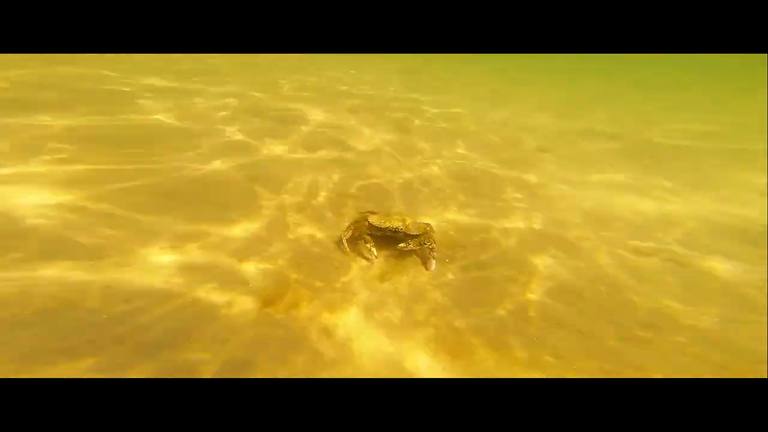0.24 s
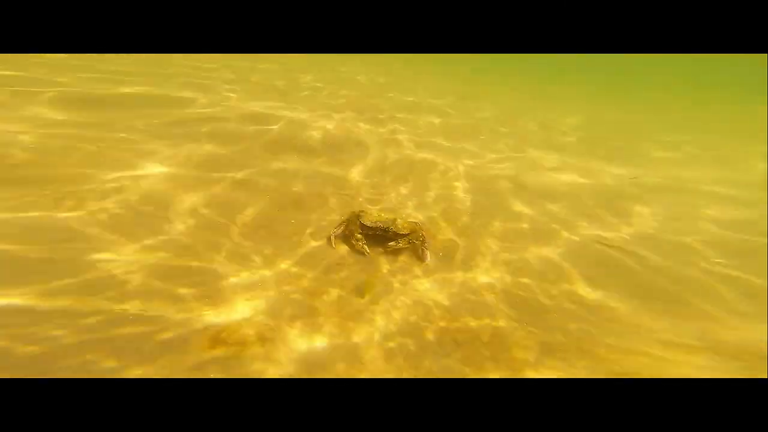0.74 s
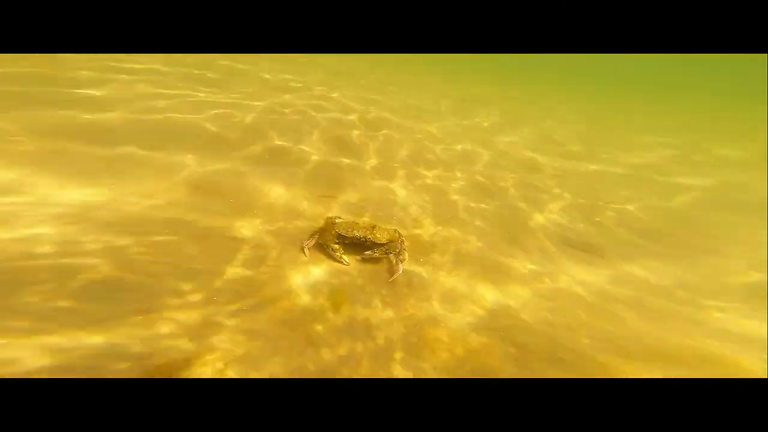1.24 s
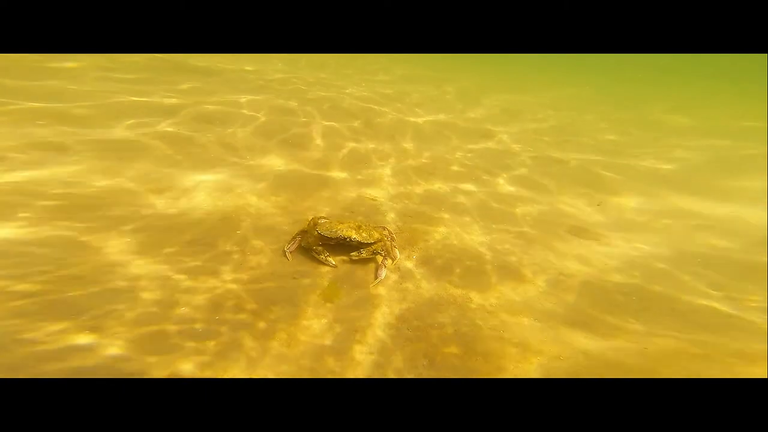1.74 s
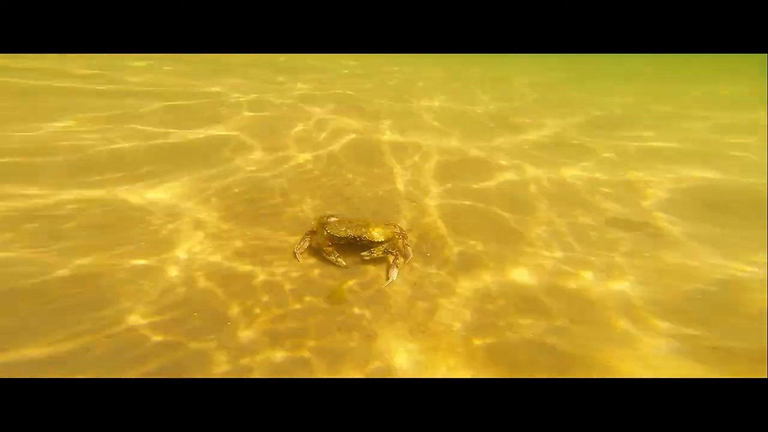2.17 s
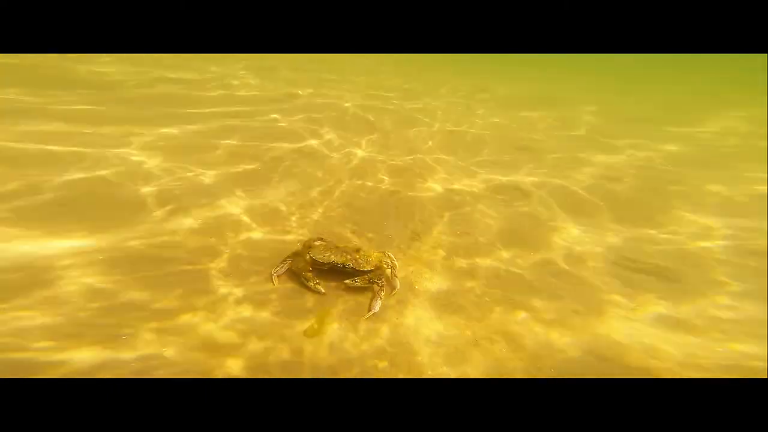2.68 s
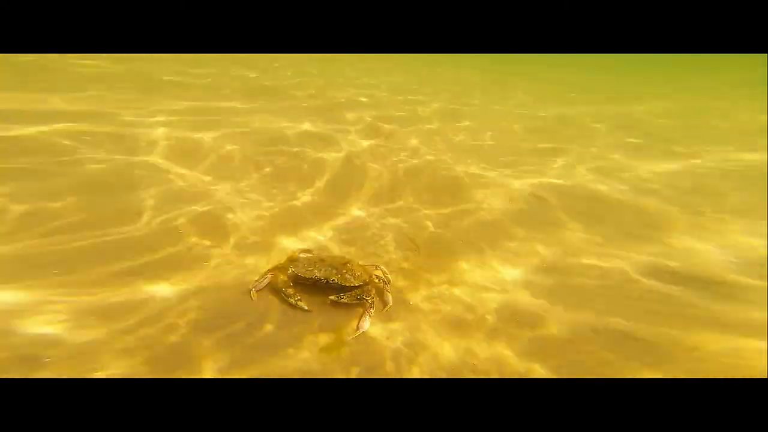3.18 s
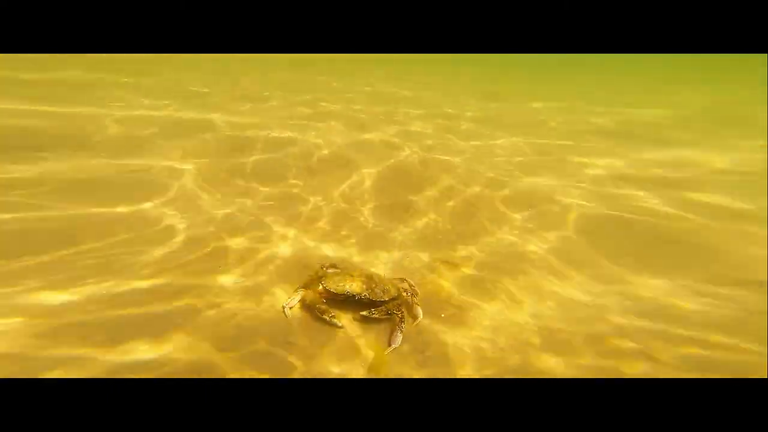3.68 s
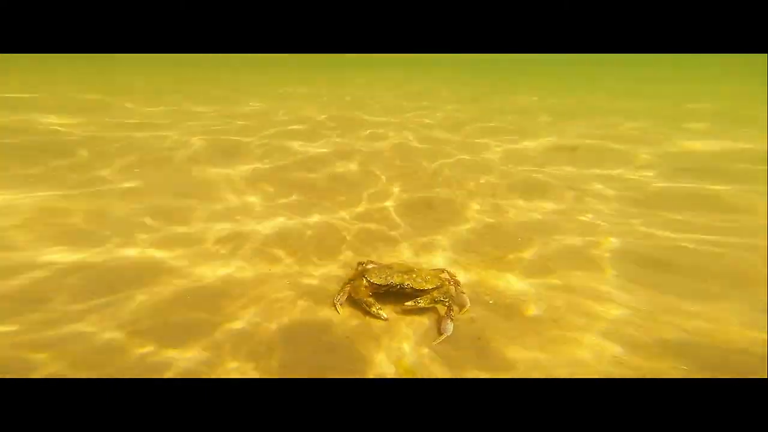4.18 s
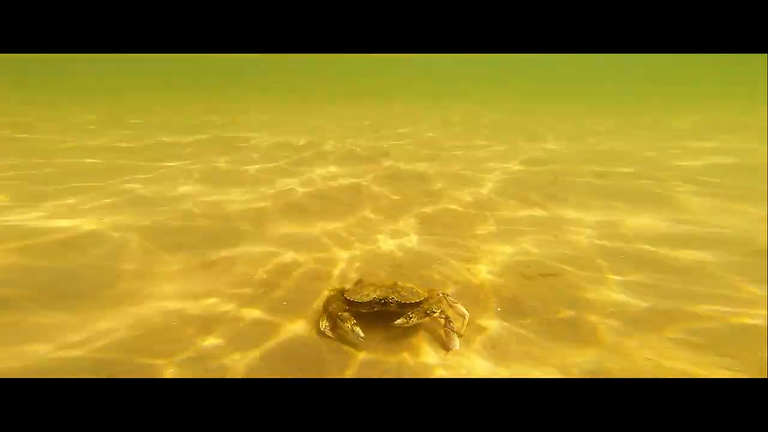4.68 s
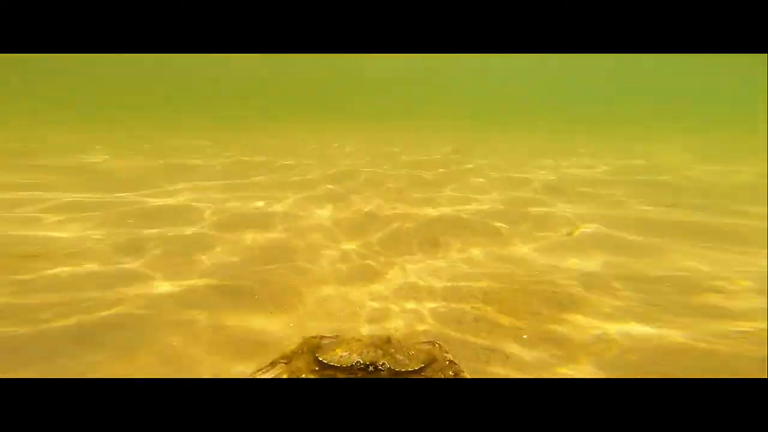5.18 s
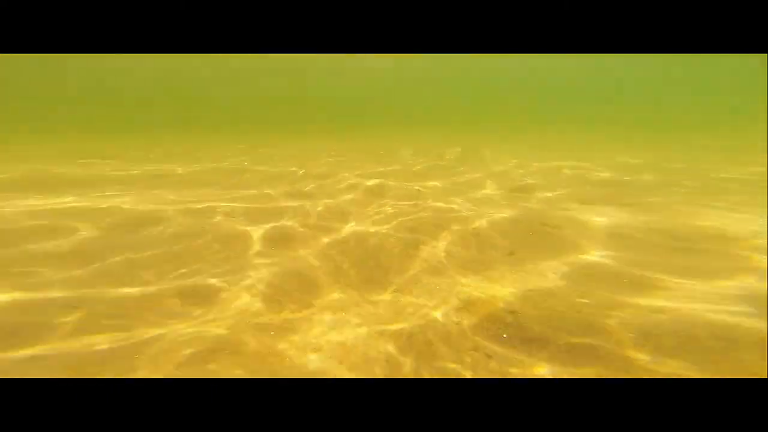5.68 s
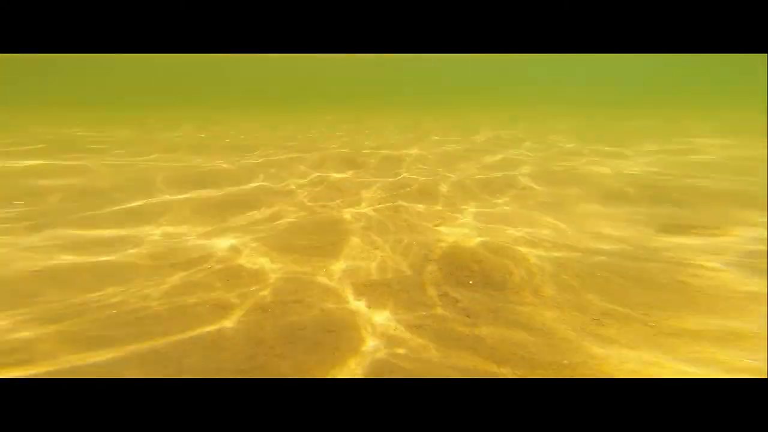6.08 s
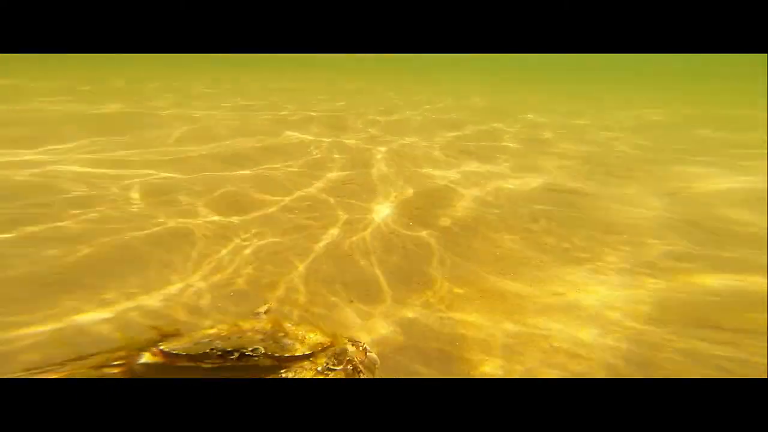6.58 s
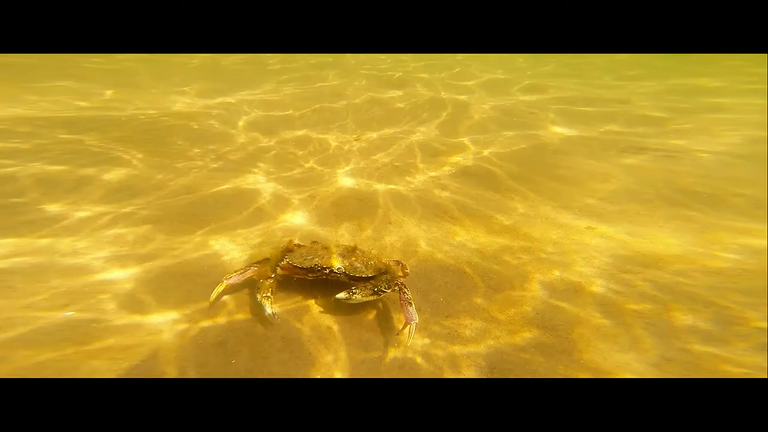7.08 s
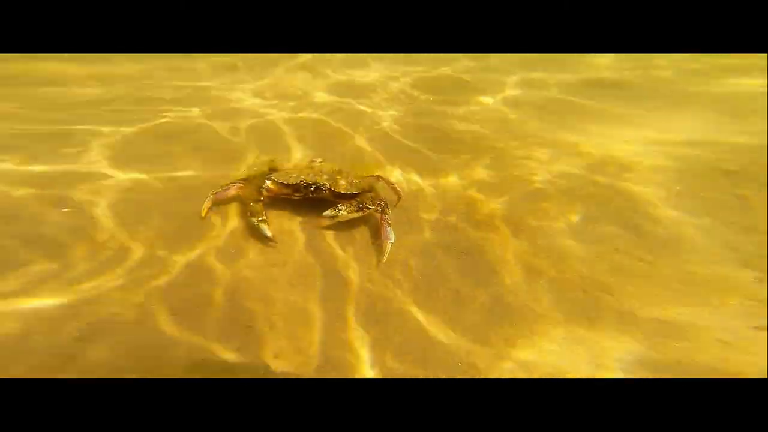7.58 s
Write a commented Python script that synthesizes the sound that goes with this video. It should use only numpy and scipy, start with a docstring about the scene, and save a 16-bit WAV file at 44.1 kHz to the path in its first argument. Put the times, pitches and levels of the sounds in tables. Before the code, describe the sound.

The microphone sits inside a plastic waterproof case held in shallow sea, so everything is close, dry and muffled. Low water rumble, barely audible gurgle and steady electronic hiss run throughout, with a thin high whine and pips switching in quick beats. Small clicks come at 0.2, 0.4 and 1.5 s, with faint creaks and rubbing around 1.1 s. After a quieter stretch, a short groan and tight squeak near 3.1 s lead to crisp click clusters at 3.2 and 3.4 s. Creaks run from 4.4 to 4.9 s with tiny bubble blips; soft hollow bumps multiply from 5 to 6.5 s, with a bubble plop and water surge at 6.3. A strong click and boom at 6.76 start the climax: hard chattering knocks at 7.0, rough rubbing and bright creaks until 7.3. It calms, then deep thuds land around 7.76 s.

```python
"""Low water rumble, gurgle and hiss run throughout, under the dry clicks of a hand gripping a plastic case.
The microphone is in a camera in that waterproof case, carried through shallow sea above a crab on sand.
The grip creaks in runs of tiny slips, and bumps of the hand make the case boom; late on it is knocked and
rubbed hard. Contacts ring resonances of the case, water is shaped noise with single sine bubbles, and the
electronics add filtered noise: a steady hiss, with a whine and pips gated in beats."""
import sys
import numpy as np
from scipy import signal
from scipy.fft import rfft, irfft
from scipy.io import wavfile
from scipy.ndimage import uniform_filter1d

SR = 44100
rng = np.random.default_rng(int(sys.argv[2]) if len(sys.argv) > 2 else 0)


def output_pcm(signal):
    """Save a mono or channel-first signal as 16-bit PCM at the path in sys.argv[1].

    Samples are clipped to [-1, 1] before scaling.
    """
    pcm = np.clip(np.atleast_2d(signal).T, -1, 1) * 32767
    wavfile.write(sys.argv[1], SR, np.round(pcm).astype(np.int16))


N = 345303
TIME = np.arange(N) / SR  # s
RING_SIZE = 8192  # samples in the ring of one blow
RING_HZ = np.maximum(np.fft.rfftfreq(RING_SIZE, 1 / SR), 1)

# Resonances of the case walls. Each row: frequency in Hz, width in Hz, relative level in dB.
WALL_MODES = [(555, 33, -7), (649, 106, 1.5), (798, 62, -7.5), (885, 85, -6), (1222, 33, -10.5),
              (1267, 34, -13.5), (1435, 39, -2), (1508, 168, 3.5), (1787, 120, -0.5), (1897, 120, -1.5),
              (2010, 160, -5.5), (2207, 130, -1.5), (2370, 60, -11), (2405, 72, -2.5), (2545, 140, -2.5),
              (2744, 230, -12.5), (2977, 150, -14), (3710, 470, -28.5), (4066, 250, -24.5),
              (4860, 240, -32.5), (5600, 350, -48), (6800, 350, -47), (7300, 130, -45)]
# The whole case bouncing in the hand. Each row: frequency in Hz, width in Hz, relative level in dB.
BOUNCE_MODES = [(45, 33, -16.5), (105, 59, -7.5), (135, 18, -7), (158.2, 17.1, 0)]


def creaks():
    """The grip lets go in runs of short, dry slips that ring the case walls."""
    return blows(slip_runs(), WALL_MODES, grit_db=-0.5, grit_t60=0.023, tail_db=-12.5, tail_t60=0.052)


def slip_runs(size=32, jitter=0.05, scatter_db=2.3, edge_db=-3):
    """Slips come at an almost even rate as the load rises or falls: rows (s, dB, brightness, edge dB)."""
    # Runs of slips. Each row: start in seconds, end in seconds, slips per second, level at the start in dB,
    # level at the end in dB, brightness in dB per octave.
    creak_table = [(1.061, 1.082, 118, -47.5, -42, 2.5), (1.151, 1.197, 78, -47, -45, -6.5),
                   (3.096, 3.183, 116, -49.5, -49, -4), (4.452, 4.48, 50, -49, -42, -4),
                   (4.498, 4.567, 73, -45, -47.5, -6.5), (4.6, 4.686, 66, -44.5, -50, -6),
                   (4.745, 4.847, 68.3, -40, -42, -9), (5.237, 5.277, 91, -45, -40, -9),
                   (5.956, 5.985, 50, -52, -47, -16), (6.099, 6.139, 75, -45.5, -46, -10.5),
                   (6.813, 6.918, 73, -39, -40.5, -12), (7.162, 7.203, 113, -34, -27.5, 6.5),
                   (7.209, 7.244, 93, -29, -50, 6), (7.277, 7.319, 118, -40, -42.5, 1)]
    rows = []
    for start, end, per_s, first_db, last_db, tilt_db in creak_table:
        uneven_time, uneven_level = rng.standard_normal((2, size))
        # jitter is a share of the gap between slips
        times = start + (np.arange(size) + jitter * uneven_time) / per_s
        levels = np.interp(times, [start, end], [first_db, last_db]) + scatter_db * uneven_level
        rows += [(s, db, tilt_db, edge_db) for s, db in zip(times, levels) if s < end]
    return rows


def clicks():
    """Slips of the grip, loud and faint, alone or in short uneven groups, set the case walls ringing."""
    # Each row: time in seconds, level in dB, brightness in dB per octave, lift of the sharp edge in dB.
    click_table = [(0.188, -38.5, 1.5, 8), (0.207, -46, 3, 0), (0.213, -38.5, 3, 4), (0.222, -49, -3, 0),
                   (0.414, -32.5, 0, 10), (0.429, -35, 0.5, -1), (0.436, -40, -3, -4), (0.446, -44, -5, 0),
                   (0.775, -53, 0, 0), (1.054, -42.5, -5, 0), (1.533, -39.5, 1, 5), (1.543, -45, -2, 0),
                   (3.186, -37, 4, 10), (3.194, -32, 3, 10), (3.205, -31, 2.5, 5), (3.221, -35.5, 11, -8),
                   (3.226, -34.5, -1.5, 10), (3.402, -29.5, 3.5, -11), (3.409, -29.5, -4.5, -8),
                   (3.421, -31, -3, -4), (3.433, -34, -6, -5), (3.56, -45.5, -8, -2),
                   (3.909, -34.5, -1, -9), (3.928, -42.5, -5, -2), (4.17, -46.5, -3, -4),
                   (4.862, -43, -1.5, 11), (5.069, -40.5, -0.5, -8), (5.089, -47, -4, -2),
                   (5.198, -41.5, -6, -2), (5.287, -34.5, -6, -6), (5.317, -39.5, -4.5, -2),
                   (5.332, -44.5, -8, -2), (5.573, -44.5, -4, 6), (6.318, -39, -15.5, 0),
                   (6.468, -49.5, -4, 0), (6.707, -44.5, -5, -2), (6.742, -38, -4, -4),
                   (6.752, -41, -6, -2), (6.762, -24, -2, 1), (6.771, -25.5, -5, -2),
                   (6.778, -25.5, -7, -5), (6.945, -35, -11, 0), (6.966, -35.5, -6.5, 5),
                   (7.106, -37, -4, 2), (7.115, -34.5, -5.5, -3), (7.567, -44.5, -3, -1)]
    return blows(click_table, WALL_MODES, grit_db=-3.0, grit_t60=0.015, tail_db=-13.5, tail_t60=0.06)


def knocks():
    """Hard contacts against the case chatter and favour the middle modes of the walls."""
    # How well a knock couples to the walls. Each row: frequency in Hz, gain in dB.
    coupling = [(550, -5.5), (680, -8), (880, 0.5), (1250, 4), (1500, 2), (2000, 2), (2500, -3),
                (3000, 0.5), (4100, -2.5), (7000, -8)]
    at_hz, gain_db = np.transpose(coupling)
    modes = []
    for hz, width, db in WALL_MODES:
        modes.append((hz, width, db + np.interp(np.log(hz), np.log(at_hz), gain_db)))
    return blows(rebounds(), modes, grit_db=5.0, grit_t60=0.017, tail_db=-28.5, tail_t60=0.033)


def rebounds(gap_s=0.0038, loss_db=4.5, dulling_db=5.5):
    """Each rebound of a knock is weaker and duller: rows (s, dB, brightness, edge dB)."""
    # First contacts. Each row: time in seconds, level in dB, brightness in dB per octave,
    # lift of the sharp edge in dB, chatter in seconds.
    knock_table = [(6.99, -21, -3.5, -1, .006), (7.0, -11, -1, -3, .006), (7.023, -19, 0, 3, .002),
                   (7.035, -21, -4.5, 3, .002), (7.04, -9.5, 5, 6, .01), (7.051, -12.5, 3, -2.5, .014)]
    rows = []
    for s, db, tilt_db, edge_db, chatter_s in knock_table:
        for k in range(1 + int(chatter_s / gap_s)):
            rows.append((s + k * gap_s, db - k * loss_db, tilt_db - k * dulling_db, edge_db))
    return rows


def bumps():
    """A soft push of the hand sets the whole case bouncing for a few cycles."""
    # Each row: time in seconds, level in dB, brightness in dB per octave.
    bump_table = [(1.05, -46, 19), (1.716, -44, 5), (1.877, -45.5, -4), (2.093, -46.5, 4), (2.138, -48, 6),
                  (2.97, -42, -4), (3.4, -41, -5), (4.107, -44, -2), (4.248, -43.5, 10), (4.585, -41, 3),
                  (4.92, -39.5, -2.5), (4.991, -38, 4), (5.31, -37.5, -3), (5.408, -44, 0),
                  (5.493, -36, -3), (5.522, -36.5, 10), (5.658, -34, 5), (5.726, -47, -4), (5.748, -38, 6),
                  (5.823, -43.5, 3), (5.88, -40, 6), (6.006, -36, 6), (6.141, -38, 1), (6.209, -37, 9),
                  (6.251, -39.5, 18), (6.295, -41, 6), (6.457, -41, 2), (6.777, -25, 4), (6.849, -33, 14),
                  (7.001, -28.5, 29.5), (7.151, -41.5, 13), (7.206, -42, 20), (7.756, -24, 25),
                  (7.77, -26, 9), (7.805, -34, 22)]
    out = np.zeros(N)
    for s, db, tilt_db in bump_table:
        bounce = body(BOUNCE_MODES, scatter_db=3.5, tilt_db=tilt_db)
        add(out, s, -at_level(bounce, db, span=0.023))
    return out


def rubbing(dull_tilt_db=-16.0, crisp_tilt_db=-3.5, peak_share=0.45):
    """Sliding fingers shed dense micro-slips: soft ones favour the low wall modes, hard ones reach higher."""
    # Strokes. Each row: start in seconds, end in seconds, dull rub in dB, crisp rub in dB.
    stroke_table = [(1.15, 1.243, -55.5, -57), (1.287, 1.322, -60, -73), (1.444, 1.502, -62, -59),
                    (1.504, 1.67, -77, -57.5), (1.66, 1.725, -77, -53.5), (1.748, 1.81, -74, -55),
                    (2.473, 2.613, -56, -79), (2.674, 2.834, -58.5, -84), (3.044, 3.224, -62, -53),
                    (3.433, 3.632, -57.5, -66), (3.898, 4.039, -56, -55), (4.147, 4.197, -74, -52.5),
                    (4.205, 4.32, -54.5, -53), (4.715, 4.758, -43, -59), (6.73, 6.832, -44, -48),
                    (6.854, 6.995, -46.5, -50), (7.016, 7.153, -42.5, -58), (7.155, 7.255, -40.5, -44),
                    (7.26, 7.323, -45.5, -50), (7.562, 7.601, -63.5, -54.5), (7.745, 7.883, -55, -53.5)]
    dull = through(grains(per_s=900, spread_db=-1.5), WALL_MODES, tilt_db=dull_tilt_db)
    crisp = through(grains(per_s=1000, spread_db=4.5), WALL_MODES, tilt_db=crisp_tilt_db)
    soft, hard = np.zeros((2, N))
    for start, end, dull_db, crisp_db in stroke_table:
        # the finger presses hardest at peak_share of the stroke
        along = TIME[:SR] / (end - start)
        pressure = np.sqrt(np.interp(along, [0, peak_share, 1], [0, 1, 0]))
        add(soft, start, from_db(dull_db) * pressure)
        add(hard, start, from_db(crisp_db) * pressure)
    return disperse(soft * dull + hard * crisp)


def squeak(start_s=3.065, end_s=3.2, level_db=-48.5, attack_s=0.024, release_s=0.01):
    """A dry, tight rub: very dense micro-slips, band-limited to ring the middle modes of the walls."""
    band = signal.butter(2, [1450, 2250], "band", fs=SR, output="sos")
    slips = grains(per_s=1200, spread_db=4.5) + 1e-18
    rasp = through(signal.sosfilt(band, slips), WALL_MODES)
    ramps = np.minimum((TIME - start_s) / attack_s, (end_s - TIME) / release_s)
    pressure = np.clip(ramps, 0, 1) ** 2
    return from_db(level_db) * pressure * rasp


def groans(waver=0.074):
    """A finger sticks and slips fast enough to groan: an unsteady tone and overtone, swelling and dying."""
    # Each row: start in seconds, end in seconds, starting pitch in Hz, ending pitch in Hz,
    # level at mid-groan in dB, overtone in dB relative to the first tone.
    groan_table = [(2.98, 3.121, 361, 446, -67, 6), (4.295, 4.472, 530, 452, -60, -22),
                   (6.904, 6.978, 241.5, 284, -47, 3.5)]
    out = np.zeros(N)
    wobble = 1 + waver * rms_one(uniform_filter1d(rng.standard_normal(SR), size=300))
    for start, end, start_hz, end_hz, db, overtone_db in groan_table:
        along = np.clip(TIME[:SR] / (end - start), 0, 1)
        pitch_hz = wobble * (start_hz + (end_hz - start_hz) * along)
        phase = 2 * np.pi * np.cumsum(pitch_hz) / SR
        swell = np.sqrt(8 * along * (1 - along))
        tone = np.sin(phase) + from_db(overtone_db) * np.sin(2 * phase)
        add(out, start, from_db(db) * swell * tone)
    return out


def tremor(trim_db=2.0):
    """The unsteady hand keeps the case booming: sparse random pushes ring its bounce modes."""
    # Each row: time in seconds, level in dB before the trim.
    tremor_table = [(0.0, -53), (0.75, -70), (1.08, -55), (1.4, -56), (1.78, -56), (2.4, -58),
                    (3.05, -54.5), (3.35, -60.5), (3.95, -52), (4.4, -55), (4.75, -54), (5.15, -58.5),
                    (5.7, -55.5), (6.6, -58), (7.0, -41), (7.45, -62), (7.83, -55)]
    boom = gain_in_time(tremor_table)
    return from_db(trim_db) * boom * through(grains(per_s=60, spread_db=3.5), BOUNCE_MODES)


def ticks(decay_s=0.0025):
    """Sharp grains of sand tick on the case: tiny bright noise bursts, too light to ring the walls."""
    # Each row: time in seconds, level in dB.
    tick_table = [(0.4135, -70), (1.6841, -63), (3.8571, -57), (4.1599, -61), (4.2028, -58), (4.862, -57),
                  (5.571, -58), (7.2403, -52), (7.5026, -53.5)]
    out, t = np.zeros(N), TIME[:RING_SIZE]
    bright = signal.butter(4, [3200, 9800], "band", fs=SR, output="sos")
    for s, db in tick_table:
        burst = rng.standard_normal(RING_SIZE) * np.exp(-t / decay_s)
        add(out, s, at_level(signal.sosfilt(bright, burst), db, span=0.0013))
    return out


def bubbles(rise=1.5):
    """Single bubbles close by: each rings briefly as a decaying sine, its pitch creeping up."""
    # Each row: time in seconds, peak level in dB, starting pitch in Hz, time to fall by 60 dB in seconds.
    bubble_table = [(3.859, -38.5, 3090, 0.015), (4.864, -33.5, 2750, 0.0054), (4.737, -39, 900, 0.012),
                    (5.115, -43, 890, 0.028), (6.288, -30, 690, 0.016), (6.291, -33, 1457, 0.053)]
    out, t = np.zeros(N), TIME[:RING_SIZE]
    for s, db, hz, t60 in bubble_table:
        decay = from_db(db - 60 * t / t60)
        add(out, s, decay * np.sin(2 * np.pi * hz * t * (1 + rise * t)))
    return out


def flow(trim_db=-0.5, surge_top_hz=60):
    """Water rumbles round the case, with a deep, smooth swell as the camera is swung and water surges past."""
    # Colour of the rumble. Each row: frequency in Hz, relative density in dB per Hz.
    rumble_colour = [(10, -5), (22, 0), (40, 1.5), (70, -7.5), (120, -14.5), (200, -25.5), (400, -25.5),
                     (1000, -53), (3000, -63)]
    # Slowly changing flow. Each row: time in seconds, level in dB before the trim.
    flow_table = [(0.0, -49), (0.7, -54.5), (1.9, -50.5), (3.2, -53), (3.85, -47.5), (4.15, -53),
                  (6.1, -54), (7.1, -41), (7.5, -49.5), (7.83, -44)]
    # Surges. Each row: strongest moment in seconds, length in seconds, level in dB.
    surge_table = [(1.15, .12, -45), (1.3, 0.11, -49), (3.48, .14, -44), (6.294, 0.14, -38.5),
                   (6.45, 0.23, -42), (6.791, .2, -33), (6.904, 0.15, -43), (7.33, 0.12, -43),
                   (7.757, 0.052, -29)]
    rumble = from_db(trim_db) * gain_in_time(flow_table) * noise(rumble_colour)
    swell = np.zeros(N)
    for s, length, db in surge_table:
        swell += from_db(db) * np.cos(np.pi * np.clip((TIME - s) / length, -0.5, 0.5)) ** 2
    low_pass = signal.butter(2, surge_top_hz, fs=SR, output="sos")
    deep = rms_one(signal.sosfilt(low_pass, noise(rumble_colour)))
    return rumble + swell * deep


def gurgle(per_s=700, cycles=16.6, low_hz=430, high_hz=950, muffle_hz=1500):
    """A crowd of small far bubbles: random pops dealt to 20 resonators over about an octave, rms 1."""
    pops = grains(per_s, spread_db=3.5)
    dealt = rng.integers(0, 20, N)
    out = np.zeros(N)
    for k, hz in enumerate(np.geomspace(low_hz, high_hz, 20)):
        r = np.exp(-np.log(1000) * hz / (cycles * SR))  # falls by 60 dB in this many cycles
        w = 2 * np.pi * hz / SR
        poles = [1, -2 * r * np.cos(w), r * r]
        out += signal.lfilter([1, 0, -1], poles, pops * (dealt == k) + 1e-18)
    return rms_one(signal.sosfilt(signal.butter(2, muffle_hz, fs=SR, output="sos"), out))


def electronics(hiss_db=-59.5, beat_s=0.138):
    """Steady hiss inside the case, with a thin whine and high pips of resonant noise gated in beats."""
    # Colour of the hiss. Each row: frequency in Hz, relative density in dB per Hz.
    hiss_colour = [(20, -3.5), (250, 2.5), (450, -6), (1000, -9), (2000, -10.5), (4000, -16.5),
                   (6000, -19.5), (9000, -26), (11000, -26), (12000, -33), (14000, -31.5), (15000, -37.5)]
    # Resonances of the whine. Each row: frequency in Hz, width in Hz, relative level in dB.
    whine_modes = [(6510, 91, 5.5), (6440, 830, -7), (10350, 220, 2.5), (10570, 2200, -7.5),
                   (12980, 200, -14), (13780, 150, -12)]
    # Resonances of the pips. Each row: frequency in Hz, width in Hz, relative level in dB.
    pip_modes = [(9770, 200, -7), (11250, 110, 7)]
    # Buzzing spells. Each row: start in seconds, end in seconds, share of each beat that is on,
    # whine in dB, pip in dB.
    buzz_table = [(0.0, .48, 0.28, -80, -76), (0.556, .68, 0.94, -72.5, -93), (.74, 1.282, 0.97, -72, -99),
                  (1.29, 1.338, 1, -83, -81), (1.397, 1.449, 1, -71, -76), (1.533, 3.1, 0.21, -80, -74.5),
                  (3.212, 4.8, 0.43, -73.5, -95), (4.883, 4.925, 1, -69, -71),
                  (5.025, 5.35, 0.19, -80, -73.5), (5.447, 6.18, 0.9, -73, -93),
                  (6.278, 6.33, 1, -67.5, -73), (6.383, 7.124, 0.36, -76, -75.5),
                  (7.159, 7.83, 0.99, -73.5, -98)]
    gates = np.zeros((2, N))
    for start, end, share, whine_db, pip_db in buzz_table:
        length = max(round((end - start) * SR), 1)
        on = TIME[:length] / beat_s % 1 < share
        add(gates[0], start, from_db(whine_db) * on)
        add(gates[1], start, from_db(pip_db) * on)
    whine_gate, pip_gate = uniform_filter1d(gates, size=200)  # softens the switching
    whine = whine_gate * through(rng.standard_normal(N), whine_modes)
    pips = pip_gate * through(rng.standard_normal(N), pip_modes)
    return from_db(hiss_db) * noise(hiss_colour) + whine + pips


def blows(rows, modes, grit_db, grit_t60, tail_db, tail_t60):
    """Each blow is a snap, a few ms of grit and a faint echo inside the case, all coloured by its walls."""
    out, t = np.zeros(N), TIME[:RING_SIZE]
    for s, db, tilt_db, edge_db in rows:
        contact = np.zeros(RING_SIZE)
        contact[0] = 1
        for part_db, t60 in ((grit_db, grit_t60), (tail_db, tail_t60)):
            dying = from_db(-60 * t / t60)
            # level relative to the one-sample snap
            contact += at_level(rng.standard_normal(RING_SIZE) * dying, part_db, span=1 / SR)
        walls = body(modes, scatter_db=1.0, tilt_db=tilt_db, edge_db=edge_db)
        blow = signal.fftconvolve(contact, walls)[:RING_SIZE]
        add(out, s, at_level(blow, db, span=0.0037))
    return disperse(out)


def body(modes, scatter_db=0, tilt_db=0, edge_db=0, hardest_hz=2900, edge_hz=3400):
    """Causal ring of steep resonances, weighted anew each time and tilted by the hardness of the blow."""
    hz, width, db = np.transpose(modes)[:, :, None]
    # above hardest_hz a harder blow tilts the modes no further
    tilt = tilt_db * np.log2(np.minimum(hz, hardest_hz) / 1000)
    edge = edge_db * (hz > edge_hz)  # a sharp edge lifts the highest modes
    weight = from_db(db + edge + scatter_db * rng.standard_normal(db.shape) + tilt)
    peaks = weight / (1 + 2 * ((RING_HZ - hz) / width) ** 2)
    height = np.sqrt(np.sum(peaks ** 2, axis=0))
    # folding the cepstrum gives the phase of a body that rings only after the blow
    cepstrum = irfft(np.log(height + 1e-6 * height.max()))
    cepstrum[1:RING_SIZE // 2] *= 2
    cepstrum[RING_SIZE // 2 + 1:] = 0
    return irfft(np.exp(rfft(cepstrum)))


def disperse(x, delay_s=0.00034):
    """Bending waves travel at unequal speeds: all-pass filters smear a snap over about a millisecond."""
    r = np.exp(-1 / (delay_s * SR)) ** 4
    for hz in np.geomspace(900, 4500, 4):
        poles = [1, -2 * r * np.cos(2 * np.pi * hz / SR), r * r]
        x = signal.lfilter(poles[::-1], poles, x)
    return x


def through(drive, modes, tilt_db=0):
    """A drive ringing in a body, rms 1."""
    return rms_one(signal.fftconvolve(drive, body(modes, tilt_db=tilt_db))[:N])


def grains(per_s, spread_db):
    """Random clicks of uneven size and either sign."""
    sizes = from_db(spread_db * np.minimum(rng.exponential(1, N), 4)) * rng.choice([-1, 1], N)
    return sizes * (rng.random(N) < per_s / SR)


def noise(colour):
    """Noise of a given spectrum, rms 1."""
    hz, db = np.transpose(colour)
    bins = np.maximum(np.fft.rfftfreq(N, 1 / SR), 1)
    gain = from_db(np.interp(np.log(bins), np.log(hz), db))
    return rms_one(irfft(rfft(rng.standard_normal(N)) * gain, N))


def at_level(sound, db, span):
    """Scale a sound so that its energy, spread over span seconds, has this level."""
    return from_db(db) * sound / np.sqrt(np.sum(sound ** 2) / (span * SR))


def gain_in_time(rows):
    """Gain curve through rows of seconds and dB."""
    s, db = np.transpose(rows)
    return from_db(np.interp(TIME, s, db))


def add(out, s, sound):
    """Mix a sound in at time s."""
    start = int(np.clip(round(s * SR), 0, N - 1))
    out[start:start + len(sound)] += sound[:N - start]


def from_db(db):
    """Decibels to gain."""
    return 10 ** (np.asarray(db) / 20)


def rms_one(x):
    """Scale to rms 1."""
    return x / np.sqrt(np.mean(x ** 2) + 1e-20)


def scene():
    """Flow and grip keep the case murmuring under the creaks, clicks, bumps and knocks."""
    contacts = creaks() + clicks() + knocks() + bumps()
    grip = rubbing() + squeak() + groans() + tremor()
    water = ticks() + bubbles() + flow() + from_db(-64.5) * gurgle()
    return (contacts + grip + water + electronics())[None]


def record(dry):
    """The top is cut steeply above 15.2 kHz."""
    return signal.sosfilt(signal.ellip(10, 0.1, 70, 15200, fs=SR, output="sos"), dry)


dry = scene()
out = record(dry)
output_pcm(out)
```